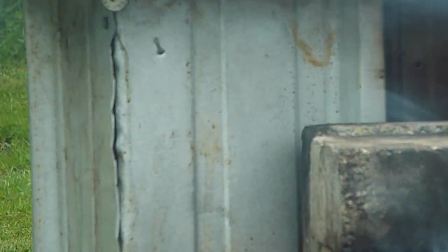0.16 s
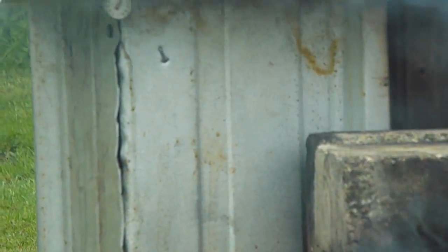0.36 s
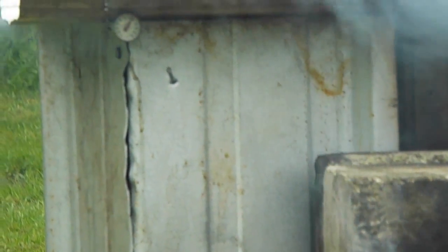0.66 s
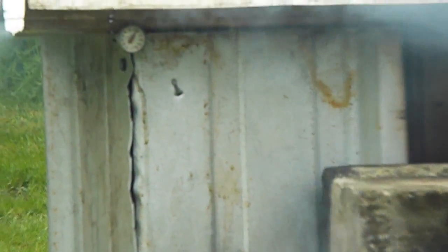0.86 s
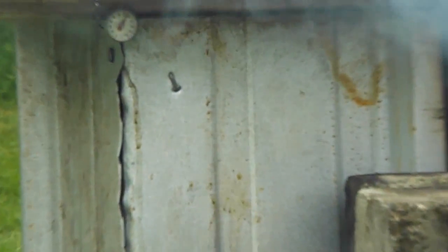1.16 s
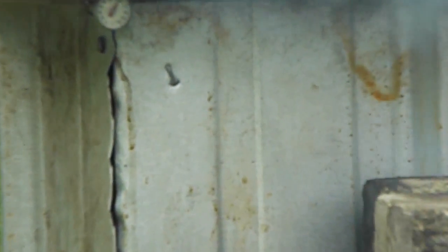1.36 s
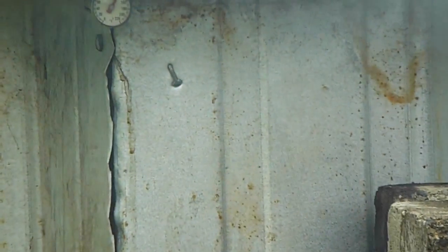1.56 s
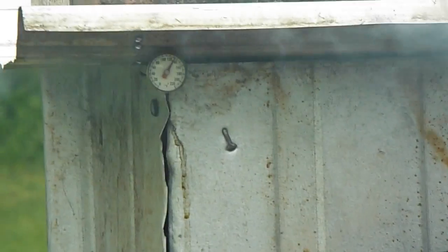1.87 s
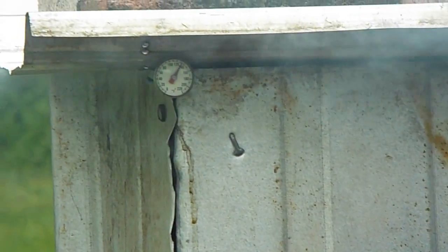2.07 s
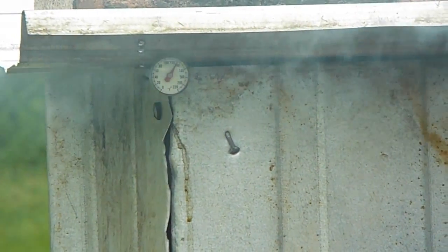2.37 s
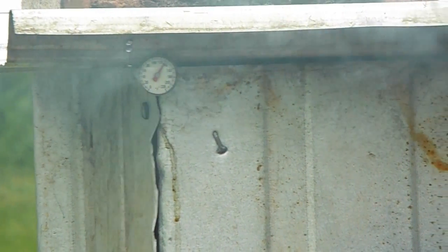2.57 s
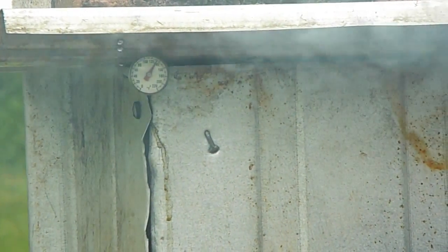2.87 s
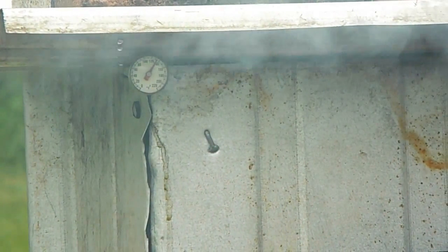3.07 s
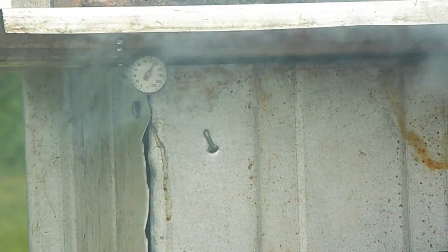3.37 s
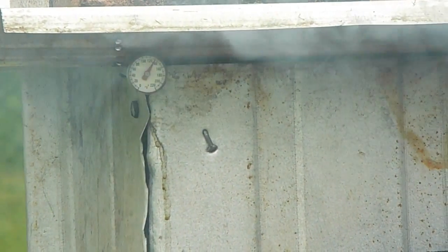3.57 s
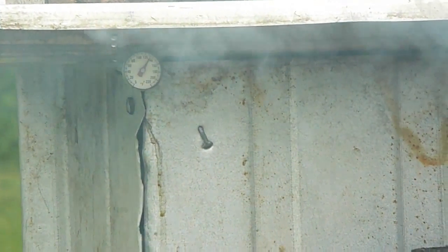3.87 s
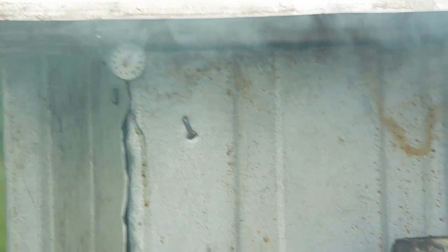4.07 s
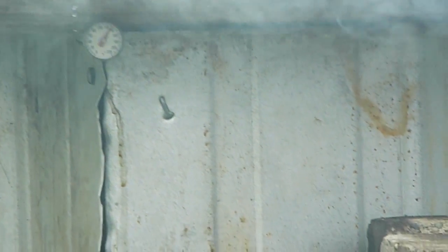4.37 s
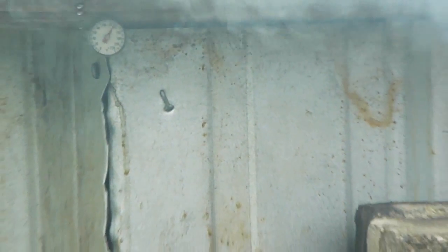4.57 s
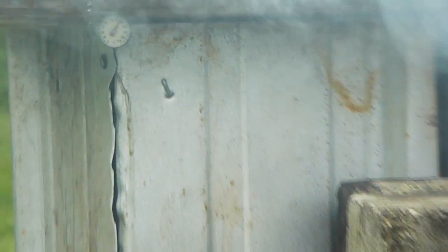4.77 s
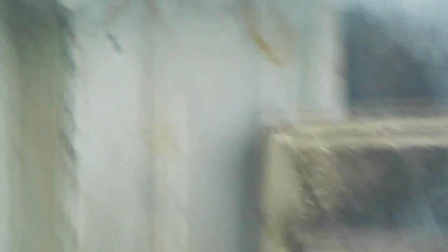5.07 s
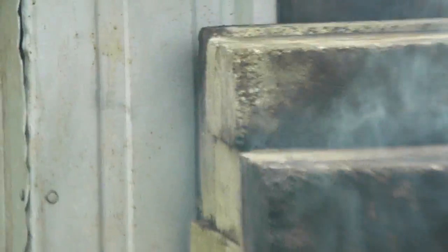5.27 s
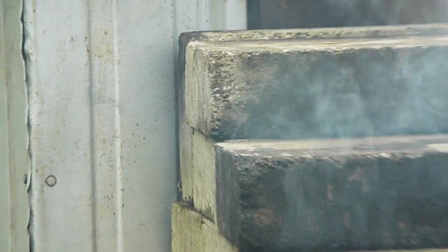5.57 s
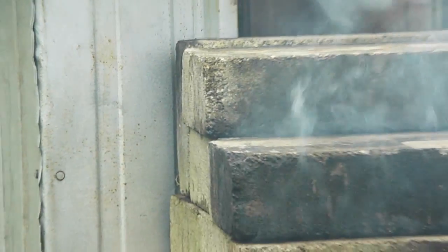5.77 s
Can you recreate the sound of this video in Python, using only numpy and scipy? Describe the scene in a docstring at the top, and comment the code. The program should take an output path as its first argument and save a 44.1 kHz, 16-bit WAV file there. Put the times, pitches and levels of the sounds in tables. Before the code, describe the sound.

Outdoors, heard from a camera's own stereo microphones. Low wind flutters and thumps at once, strongest around 0.3-0.6 s, over soft air hiss. Tiny plastic clicks tick from the start, with a sharper one near 0.2 s, while a distant bird trills rapidly until about 0.8 s. At 0.8 s a small zoom motor starts with a rasp, a dry, rattling whir with a thin whine, stopping near 1.45 s. Hard clicks cluster at 1.58-1.66 s with a dull grip thud and brief plastic ringing. From 1.7 to 3.9 s faint birds chirp and call hoarsely over rumbling gusts. Clicks, a slight finger rub and soft thuds return at 3.7-4.1 s. At 4.3 s the motor starts again, brighter and buzzier, pulsing quickly, and continues to the end at 6 s. Loud snaps cut across it near 4.66, 4.8 and 5.0 s, the last strongest, as the wind dies down.

```python
"""Outdoors, close to a hand-held camera: its zoom motor runs twice, the second time on to the end.
Gear teeth shake resonances into a rattle, with a whine, thin bearing whistles and a rasp at each start.
Fingers click the lever and creak the plastic, the grip thuds: noise bursts and tones in the shell.
The shell carries these to two microphone ports, left and right. Wind noise and single eddies push on
the ports, small birds call far off in gliding near-sine notes, and soft air noise lies beneath."""
import sys
import numpy as np
from scipy import signal
from scipy.fft import rfft, irfft, next_fast_len
from scipy.io import wavfile

SR = 44100
rng = np.random.default_rng(int(sys.argv[2]) if len(sys.argv) > 2 else 0)


def digitize_waveform(pressure):
    """Quantize a signal to 16-bit integers and store it at the path in sys.argv[1].

    Rows of a 2-D input are taken as channels; values are limited to [-1, 1].
    """
    field = np.atleast_2d(pressure).T
    bounded = np.clip(field, -1, 1)
    quanta = np.round(bounded * 32767).astype(np.int16)
    wavfile.write(sys.argv[1], SR, quanta)


N = 261513


def from_db(db):
    """Decibels become a plain gain."""
    return 10 ** (np.asarray(db) / 20)


def rms_one(x):
    """Scale a signal to an average strength (RMS) of 1."""
    return x / np.sqrt(np.mean(x ** 2) + 1e-20)


def at_hz(points, hz):
    """Read a curve between its points, along a logarithmic frequency scale."""
    point_hz, value = np.transpose(points)
    return np.interp(np.log(hz + 1), np.log(point_hz + 1), value)


def drift(rate_hz):
    """Random wandering of RMS 1: noise smoothed by two equal low-pass steps."""
    r = np.exp(-2 * np.pi * rate_hz / SR)
    noise = rng.standard_normal(N + SR)
    return rms_one(signal.lfilter([1], [1, -2 * r, r * r], noise)[SR:])  # drop the settling second


def coloured(spectrum):
    """Two unrelated noises with the given spectrum, together of RMS 1."""
    size = next_fast_len(N)
    hz = np.arange(size // 2 + 1) * SR / size
    white = rfft(rng.standard_normal((2, size)))
    return rms_one(irfft(white * from_db(at_hz(spectrum, hz)), size)[:, :N])


def resonate(x, hz, width_hz):
    """One resonance: passes a band around its pitch, with gain 1 at the top."""
    r = np.exp(-np.pi * width_hz / SR)
    feedback = [1, -2 * r * np.cos(2 * np.pi * hz / SR), r * r]
    return signal.lfilter([(1 - r * r) / 2, 0, (r * r - 1) / 2], feedback, x)


def resonate_twice(x, hz, width_hz):
    """The same resonance twice in a row, for steeper sides and a narrower band."""
    return resonate(resonate(x, hz, width_hz), hz, width_hz)


def swelling(s, db, rise_db_per_s, fall_db_per_s):
    """Gain that climbs to a top at s and sinks again, straight in decibels."""
    late = np.arange(N) / SR - s
    return from_db(db + np.minimum(rise_db_per_s * late, -fall_db_per_s * late))


def air():
    """Steady soft noise of the open air, partly shared by the two ports."""
    # spectrum of the air: (frequency [Hz], density [dB per Hz])
    air_spectrum = [(120, -29), (200, 0), (426, -9), (1420, -10.5), (1800, -12.5), (2090, -13.5),
                    (4790, -15.5), (7460, -22.5), (13700, -27.5), (15600, -26.5), (16300, -62)]
    far = coloured(air_spectrum)
    level = from_db(-63 + .5 * drift(4.2))  # the level drifts a little
    return level * (far + 0.32 * far[::-1])


def birds():
    """Near-sine notes on a bent glide; the trill echoes twice, and all calls scatter into a diffuse tail."""
    # one round of the trill: (time in round [s], length [s], start [Hz], middle [Hz], end [Hz],
    # average level [dB])
    syllable = [(0, 0.033, 5120, 4740, 3770, -57), (.037, 0.012, 4930, 4490, 4000, -59),
                (.049, .0055, 4600, 5650, 6800, -57), (.0558, .0055, 4600, 5600, 6800, -54)]
    # other clear notes: (time [s], length [s], start [Hz], middle [Hz], end [Hz], average level [dB])
    notes = [(0.423, 0.11, 1206, 1430, 1040, -65), (1.72, 0.031, 4900, 4800, 4700, -59),
             (1.797, 0.015, 5500, 5160, 4800, -57.5), (1.927, 0.073, 5770, 4600, 3570, -64),
             (2.069, 0.051, 3230, 3710, 3800, -65.5), (2.089, 0.017, 4040, 3360, 2500, -64),
             (2.082, 0.033, 6000, 5030, 3000, -66), (2.193, 0.12, 5100, 4020, 2960, -62.5),
             (2.241, .05, 6300, 5600, 4250, -65), (2.31, 0.046, 7300, 8000, 8300, -66),
             (2.403, 0.02, 6070, 6460, 6550, -66), (2.499, 0.0065, 5600, 4900, 4300, -53.5),
             (2.672, 0.007, 5500, 4900, 4400, -56.5), (2.756, .015, 5200, 5070, 4940, -61.5),
             (2.767, 0.025, 6580, 4930, 4200, -58), (2.817, 0.024, 4700, 4300, 4100, -61),
             (2.838, .012, 5500, 4780, 4280, -59), (2.847, 0.021, 5580, 4730, 4120, -55.5),
             (2.863, 0.024, 5640, 5630, 5400, -64.5), (2.905, .012, 5640, 5240, 4200, -63),
             (3.127, 0.01, 4400, 5480, 6700, -62), (4.2, .075, 4810, 4720, 4600, -72)]
    # hoarse calls: (time [s], length [s], start [Hz], middle [Hz], end [Hz], average level [dB])
    hoarse = [(3.175, .12, 6100, 6000, 5900, -68), (3.493, .125, 4870, 7100, 5700, -58),
              (3.51, .1, 5200, 6400, 5300, -63.5), (3.7, .04, 5300, 6400, 7500, -62),
              (3.733, .042, 7400, 7500, 5400, -58), (3.857, .06, 7200, 7800, 8100, -59)]
    # the trill comes back off two walls: (delay [s], level change [dB])
    echoes = [(.012, -11), (.036, -7)]
    trill_s, trill_period_s, trill_count = .192, .0718, 9
    scatter_t60_s, scatter_db = 0.52, -4.5  # walls and leaves scatter the calls

    trill = [(trill_s + k * trill_period_s + s, *rest) for k in range(trill_count) for s, *rest in syllable]
    echo = [(s + lag, *rest, db + loss_db) for lag, loss_db in echoes for s, *rest, db in trill]
    clear = trill + echo + notes
    out, rasp = np.zeros(N), drift(170)
    chances = rng.normal(0, 1, (199, 2))
    for k, (row, vary) in enumerate(zip(clear + hoarse, chances)):
        s, length, start_hz, mid_hz, end_hz, db = row
        is_clear = k < len(clear)
        u = np.linspace(0, 1, max(int(length * SR), 8))  # 0 to 1 through the note
        bend_hz = mid_hz - (start_hz + end_hz) / 2
        hz = start_hz * (1 - u) + end_hz * u + 4 * u * (1 - u) * bend_hz
        hz = hz * (1 + 0.0052 * vary[1])  # each note is a little off pitch
        loudness = from_db(db + 0.54 * vary[0]) * np.sin(np.pi * u) ** (1 if is_clear else .5)
        note = loudness * np.sin(2 * np.pi * np.cumsum(hz) / SR)
        place = slice(int(s * SR), int(s * SR) + len(u))
        out[place] += note * (1 if is_clear else rasp[place])
    out *= 1 + 0.35 * drift(160)  # uneven loudness within a note
    tail_s = np.arange(SR // 2) / SR
    tail = rng.standard_normal((2, SR // 2)) * from_db(-60 * tail_s / scatter_t60_s)
    tail *= from_db(scatter_db) / np.sqrt(np.sum(tail ** 2, axis=1, keepdims=True))
    return out + signal.fftconvolve(out[None], tail, axes=1)[:, :N]


def wind():
    """Lumpy pressure noise on each port, a deep rumble and a faster flutter; the left port is more sheltered."""
    # wind strength before lumps and shelter: (time [s], rumble level [dB], flutter level [dB])
    gusts = [(0.0, -33, -57), (0.27, -34, -50), (0.35, -33, -31.5), (0.45, -49, -34), (0.54, -36, -39.5),
             (0.72, -47, -58), (1.24, -36, -36.5), (1.36, -49, -51.5), (1.52, -54, -82), (1.78, -45, -55.5),
             (1.85, -36, -55.5), (2.1, -35.5, -48.5), (2.5, -38.5, -62.5), (2.63, -36.5, -47.5),
             (2.69, -42.5, -62), (2.77, -36, -45), (2.85, -42.5, -64), (2.99, -38.5, -56),
             (3.12, -39.5, -89), (3.38, -50, -62.5), (3.6, -42.5, -68), (3.75, -49.5, -71.5),
             (4.19, -54.5, -71.5), (4.4, -65, -64), (4.75, -50, -70), (5.2, -59.5, -62.5), (5.93, -63, -67)]
    # spectrum of the rumble: (frequency [Hz], density [dB per Hz])
    rumble_spectrum = [(15, -5.5), (30, 0), (50, 0.5), (80, -5), (120, -16), (300, -70.5), (1000, -110)]
    # spectrum of the flutter: (frequency [Hz], density [dB per Hz])
    flutter_spectrum = [(50, -34.5), (100, -1), (150, -2.5), (220, -10.5), (320, -23.5), (500, -33),
                        (1000, -60.5), (3000, -110)]
    s, *levels_db = np.transpose(gusts)
    rumble_db, flutter_db = [np.interp(np.arange(N) / SR, s, db) for db in levels_db]
    lumps = np.array([drift(11.4), drift(17.0)])  # one per port
    rumble = coloured(rumble_spectrum) * from_db(rumble_db + 4.6 * lumps)
    flutter = coloured(flutter_spectrum) * from_db(flutter_db + 3.8 * lumps)
    fade_in = np.clip(np.arange(N) / 600, 0, 1)
    return (rumble + flutter) * from_db([[-2.5], [1.5]]) * fade_in


def buffets():
    """Each eddy that hits a port is a swelling and sinking push of about two cycles."""
    # single eddies: (time [s], level [dB], pitch [Hz], left minus right [dB])
    eddies = [(0.281, -38, 111, -23), (0.399, -36, 119, -12), (0.546, -28, 117, -12),
              (0.319, -20.5, 159, 5), (0.332, -19.5, 84, -2), (0.355, -24.5, 61, -16),
              (0.433, -20, 101.5, -16), (0.489, -28.5, 76, -13), (0.592, -25, 134, -14),
              (0.706, -38, 107, -17), (1.159, -31.5, 126, -11), (1.319, -28, 115, -15),
              (1.951, -29, 109, -2), (2.085, -25.5, 68.6, 9), (2.342, -31.5, 65, -17),
              (2.384, -39.5, 168, -17), (2.596, -30.5, 65.4, 13), (2.751, -29.5, 64.3, -15.5),
              (2.878, -32, 79, -2), (2.968, -27, 62.5, -4)]
    edge_share, edge_ratio = 0.26, 2.317  # sharp ripple mid-eddy: share, multiple of the pitch
    out = np.zeros((2, N))
    for s, db, hz, pan_db in eddies:
        cycles = np.arange(int(1.9 * SR / hz)) * hz / SR
        swell = np.sin(np.pi * cycles / cycles[-1]) ** 2
        edge = edge_share * swell * np.sin(2 * np.pi * edge_ratio * cycles)
        push = (np.sin(2 * np.pi * cycles) + edge) * swell
        port_db = db + np.array([[pan_db / 2], [-pan_db / 2]])
        out[:, int(s * SR):int(s * SR) + len(cycles)] += from_db(port_db) * push
    return out


def through_shell(left, right):
    """The shell carries each frequency to the two ports with its own balance and phase."""
    # balance of the ports: (frequency [Hz], left minus right [dB])
    shell_pan = [(60, 1), (110, 1), (200, -1), (380, -3.5), (700, 1.5), (1290, -0.5), (2380, -0.5),
                 (4400, -3), (8120, -10), (15000, -0.5)]
    # how far the left port leads: (frequency [Hz], phase [radians])
    shell_phase = [(0, 0.46), (1700, 0.76), (3000, -2), (3500, -2.5), (4600, -0.4), (6500, -1.5),
                   (8400, -0.73), (16600, -3)]
    size = next_fast_len(N + 4096)
    hz = np.arange(size // 2 + 1) * SR / size
    pan_db = at_hz(shell_pan, hz)
    phase = np.interp(hz, *np.transpose(shell_phase))
    left_port = rfft(left, size) * from_db(pan_db / 2) * np.exp(1j * phase)
    right_port = rfft(right, size) * from_db(-pan_db / 2)
    return np.array([irfft(left_port, size)[:N], irfft(right_port, size)[:N]])


def thuds():
    """The grip shifts: a deep shell resonance swells and sinks as the palm presses it."""
    # dull thuds: (time [s], strength of the press [dB], pitch [Hz])
    presses = [(1.642, -37.5, 167), (3.856, -51.5, 165), (4.019, -43.5, 166), (4.31, -53, 168),
               (4.385, -51, 293), (4.649, -48.5, 168), (4.795, -51.5, 163.5), (4.83, -45.5, 162),
               (5.03, -51, 162)]
    width_hz, rise_db_per_s, fall_db_per_s = 55, 495, 257  # width of each of two filter passes
    noise = rng.standard_normal(N) * np.sqrt(SR / width_hz)
    out = np.zeros(N)
    for s, db, hz in presses:
        press = noise * swelling(s, db, rise_db_per_s, fall_db_per_s)
        out += resonate_twice(press + 1e-18, hz, width_hz)
    return out


def panels():
    """Some clicks leave two shell panels ringing as clear dying tones, a little off pitch each time."""
    # ringing clicks: (time [s], low panel level [dB], high panel level [dB])
    rings = [(0.181, -35, -52), (1.604, -31, -23), (1.6320, -21.5, -29.5), (1.6455, -29.5, -50),
             (1.6603, -25, -36.5), (3.7203, -28, -25), (3.8246, -61, -42), (3.8517, -57, -30),
             (3.9287, -49.5, -22.5), (3.98, -43, -32), (4.0167, -29.5, -42), (4.6621, -29, -38),
             (4.7882, -28, -38), (4.8187, -26, -35), (5.0109, -28, -24), (5.027, -23.5, -40)]
    # the two panels: (average pitch [Hz], time to die by 60 dB [s])
    panel_tones = [(1120, 0.034), (2420, 0.028)]
    out, t = np.zeros(N), np.arange(4000) / SR
    for (s, *levels_db), vary in zip(rings, rng.normal(0, .015, (len(rings), 2))):
        for db, (hz, t60), off in zip(levels_db, panel_tones, vary):
            ring = from_db(db - 60 * t / t60) * np.sin(2 * np.pi * hz * (1 + off) * t)
            out[int(s * SR):int(s * SR) + 4000] += ring
    return out


def treble_bursts():
    """Four clicks get a very short, broad burst of treble noise, as from an overloaded recorder."""
    # treble bursts: (time [s], strength before filtering [dB])
    bursts = [(1.5782, -17), (1.605, -39), (4.788, -16), (5.026, -15)]
    burst_hz, width_hz, t60_s = 13500, 18000, 0.0037  # width of each of two filter passes
    size = np.zeros(N)
    for s, db in bursts:
        late = np.arange(N) / SR - s
        size += (late >= 0) * from_db(db - 60 * np.clip(late, 0, 1) / t60_s)
    noise = rng.standard_normal(N) + .5 * rng.standard_normal((2, N))  # partly shared by left and right
    burst = size * noise * from_db([[-4.0], [0]]) + 1e-18
    return resonate_twice(burst, burst_hz, width_hz)


def fingers():
    """Each click jolts all shell resonances with rough noise that dies at its own rate; a sliding finger rubs."""
    # clicks and creaks: (time [s], strength [dB], then colour against that strength: above 7 kHz [dB],
    # middle, 1250-3000 Hz [dB], under 900 Hz [dB], length factor [times, held to 4 at most]);
    # from 900 to 1250 Hz the last two colours are averaged
    clicks = [(0.0363, -38, -31, -11, -10.5, 1.7), (0.114, -30.5, -7, -8, -14.5, 1.34),
              (0.1505, -36, -17, -2, -4, 0.63), (0.156, -38.5, -10, -14, -33, 4.5),
              (0.1742, -17, 2.5, -15.5, -38, 0.85), (0.183, -21.5, -28, -9.5, -17, 0.67),
              (0.3263, -25, -36, -8, -23, 0.72), (0.3548, -21.5, -37, -8, -23, 0.73),
              (0.4061, -13, -42, -11.5, -30, 0.67), (0.4224, -28.5, -10, -10.5, -24, 0.87),
              (0.803, -35.5, 3, -2, -12, 3.5), (1.1651, -26, -21, -11.5, -34, 1.4),
              (1.227, -24, -13, -12.5, -24.5, 1.6), (1.5776, -8.5, 5, -15, -21, 0.63),
              (1.592, -34.5, -13, 1, -5, 1.2), (1.605, -9.5, -2.5, -18.5, -19, 0.89),
              (1.6189, -30, -4, -8, -3, 1.4), (1.6319, -12.5, -4.5, -9, -13, 1.06),
              (1.646, -43.5, -21, -1, 11, 1), (1.6594, -30.5, -29, 3, 3, 1.1),
              (1.8094, -27.5, -13, -19.5, -53, 1.66), (1.828, -44, -8, -28, -33, 3.9),
              (3.7198, -10, -4, -13.5, -27, 0.99), (3.7878, -41.5, 4, -2.5, 0, 0.97),
              (3.825, -42, -14, -8, -11, 1.7), (3.851, -23.5, -7.5, -8, -14.5, 0.88),
              (3.9282, -16, -41, -10, -31, 0.71), (3.9796, -11, 0, -13, -27, 1.25),
              (3.993, -38, -7, -14, -7, 0.6), (4.0165, -7.5, 0, -10, -16.5, 0.57),
              (4.0305, -13.5, 7, -14.5, -26, 1.08), (4.0652, -42.5, -22, -2, -7, 1),
              (4.0966, -33.5, -20.5, -5, -13, 0.71), (4.303, -33.5, -2, 1.5, -34, 0.84),
              (4.6377, -23.5, -5, -8, -14, 1.16), (4.6471, -24.5, -14, -17, -14, 1),
              (4.6601, -10.5, 3.5, -17, -24.5, 1.04), (4.765, -48.5, -20, 4, -8, 1.7),
              (4.788, -8.5, -6, -13, -19, 0.78), (4.8028, -34, -19, 0.5, 2, 0.91),
              (4.8179, -19.5, -7, -9.5, -13, 1.13), (4.8434, -29.5, -12, -4.5, -28, 1.4),
              (4.978, -46.5, -22, -1, 0, 0.57), (5.0114, -9.5, 0, -11, -16, 0.81),
              (5.027, -2.5, 1.5, -20, -31.5, 0.5), (5.1197, -31.5, -16, -22, -11, 1.3),
              (5.342, -47, -12, -30, -6, 1.3)]
    # shell resonances: (pitch [Hz], width before widening [Hz], strength [dB],
    # time to die by 60 dB before the length factor [s])
    shell = [(142.6, 50, 3, 0.089), (237.4, 40, 2.5, 0.13), (489, 99.8, 5, 0.058), (899.7, 156, 5.5, 0.06),
             (1118, 334, 10.5, 0.047), (1533, 390, 7.5, 0.041), (2372, 445, 7, 0.042),
             (2868, 655, 11.5, 0.038), (4270, 430, -5.5, 0.028), (4638, 340, 0, 0.01),
             (5610, 600, 1.5, 0.017), (6080, 580, 0, 0.016), (7133, 780, -1, 0.014),
             (8500, 690, 1.5, 0.011), (9100, 690, -13, 0.0075), (12030, 4800, -18.5, 0.0076)]
    click_scatter, scatter_full_hz = 0.39, 1500  # share that differs between the ports; fades below this
    shell_top_hz = 10650  # the plastic swallows click sound above this

    s, peak_db, high_db, mid_db, low_db, stretch = np.transpose(clicks)
    length = np.clip(stretch, .2, 4)[:, None]
    tail = np.arange(4000) / SR
    chance_db = rng.normal(0, 1.2, (len(s), len(shell)))
    rough = rng.standard_normal((len(s), 3, 4000))  # one shared noise, then one per port
    rough *= 1 + 1.026 * np.exp(-tail / 0.001)  # the first contact is the hardest
    at = (np.round(s * SR).astype(int)[:, None] + np.arange(4000)).ravel()

    slide = swelling(3.915, -52, 400, 95)  # top [s], strength [dB], rise and fall [dB per s]
    rub = slide * rng.standard_normal((2, N))
    out = resonate(resonate(rub, 5700, 2500), 5500, 2300) * 5.4
    out += resonate(resonate(rub, 1800, 950), 2770, 900) * 10.5

    for k, (hz, width_hz, db, t60) in enumerate(shell):
        if hz < 900:
            part_db = low_db
        elif hz < 1250:
            part_db = (low_db + mid_db) / 2
        elif hz < 3000:
            part_db = mid_db
        else:
            part_db = high_db if hz > 7000 else 0
        # narrow resonances need a stronger push
        size = from_db(peak_db + part_db + db + chance_db[:, k]) * np.sqrt(SR / width_hz / 40)
        dying = size[:, None] * from_db(-60 * tail / (t60 * length))
        apart = click_scatter * min(1, hz / scatter_full_hz) ** 2
        ports = np.sqrt(1 - apart) * rough[:, 0] + np.sqrt(apart) * rough[:, 1:].swapaxes(0, 1)
        # lay every burst at its moment
        jolts = np.array([np.bincount(at, (dying * port).ravel(), N + 4000)[:N] for port in ports])
        out += resonate_twice(jolts + 1e-18, hz, 1.75 * width_hz)
    out[0] -= 0.26 * resonate(out[0], 9000, 5000)  # the hand keeps some treble from the left port
    band = signal.butter(4, [125, shell_top_hz], "band", fs=SR, output="sos")
    return signal.sosfilt(band, out)


def running(start_s, stop_s):
    """Motor loudness: a quick spin-up, then a coast to silence after the stop."""
    spin_up_s, coast_db_per_s = 0.0052, 815
    t = np.arange(N) / SR
    spin_up = np.clip((t - start_s) / spin_up_s, 0, 1) ** .5
    return spin_up * from_db(-coast_db_per_s * np.maximum(t - stop_s, 0))


def motor(run, resonances, whistles):
    """Teeth rattle into resonances; the meshing teeth whine on a gliding pitch that swells each gear turn."""
    # the motor sound dips just after some clicks, holds low, then rises again:
    # (time [s], depth [dB], hold [s])
    dips = [(4.67, 5.5, 0.0083), (4.798, 9, 0.011), (5.033, 11.5, 0.028)]
    dip_rise_db_per_s = 225
    shell_scatter = 0.22  # share of rattle that differs between the ports
    throb_db, wobble = 0.9, 0.042  # an off-centre gear swings load and speed once a turn
    low_throb_db, rotor_hz, rotor_db = 1.9, 88.8, 2.2  # low rattle also beats with gear and rotor
    flicker_db, flicker_hz, flicker_top_hz = .8, 21, 5920  # each low resonance drifts on its own
    hollow_hz, hollow_width_hz, hollow_share = 3390, 104, 0.62  # the lens barrel swallows a narrow band
    mesh_settle_s = 0.2  # the mesh tone comes up once the gears run true
    start_db, start_hz, start_width_hz, start_fade_db_per_s = -48, 1600, 750, 110  # starting rasp

    (start, stop, rattle_db, slow_hz, fast_hz, fast_s,
     tone_db, overtone_db, turns_hz, turn_start, swell_db) = run
    t = np.arange(N) / SR
    since = t - start
    mesh_hz = np.interp(t, [start, fast_s, stop], [slow_hz, fast_hz, slow_hz])
    turn = 2 * np.pi * (turn_start + turns_hz * since) + 0.33 * drift(5.55)
    load = np.cos(turn)

    # two gear pairs, each with one shared noise and one per port
    teeth = rng.standard_normal((2, 3, N)) * from_db(throb_db * load + 0.54 * drift(150))
    ports = np.sqrt(1 - shell_scatter) * teeth[:, :1] + np.sqrt(shell_scatter) * teeth[:, 1:]
    beat_db = low_throb_db * load + rotor_db * np.cos(2 * np.pi * rotor_hz * since + drift(1.3))
    rattle = np.zeros((2, N))
    for k, (hz, width_hz, db) in enumerate(resonances):
        move_db = beat_db + flicker_db * drift(flicker_hz) if hz < flicker_top_hz else 0
        rattle += from_db(db + move_db) * resonate_twice(ports[k % 2], hz, 2.0 * width_hz)
    rattle = rattle - hollow_share * resonate(rattle, hollow_hz, hollow_width_hz)

    speed = 1 + wobble * np.sin(turn) + 0.00674 * drift(42.5)
    mesh = 2 * np.pi * np.cumsum(mesh_hz * speed) / SR
    swell = from_db(swell_db * (load - 1.5) + 2.5 * drift(30))
    grain = 0.84 + 0.52 * drift(190)  # uneven teeth smear the tones into rough bands
    settle = np.clip(since / mesh_settle_s, 0, 1) ** 2
    tone = from_db(tone_db) * settle * np.sin(mesh)
    overtone = from_db(overtone_db) * np.sin(2 * mesh)
    whine = swell * grain * (tone + overtone)
    for hz, db in whistles:
        level = from_db(db + beat_db + 2 * drift(25))
        wander_hz = hz * (1 + .011 * drift(4))
        whine = whine + level * np.sin(2 * np.pi * np.cumsum(wander_hz) / SR)

    # rasp while the gears take up the load
    rasp = rms_one(resonate_twice(ports[0], start_hz, start_width_hz))
    rasp = rasp * from_db(start_db - start_fade_db_per_s * np.maximum(since, 0))
    dips_db = np.zeros(N)
    for s, db, hold in dips:
        dips_db += (t > s) * np.clip(db - dip_rise_db_per_s * (t - s - hold), 0, db)
    sound = from_db(rattle_db) * rms_one(rattle) + whine + rasp
    return running(start, stop) * from_db(-dips_db) * sound


def scene():
    """The camera's own sounds go through the shell; wind, birds and air reach the ports directly."""
    # motor runs: (start [s], stop [s], rattle level before the dips [dB], slowest gear mesh [Hz],
    # fastest mesh [Hz], fastest at [s], mesh tone before swell [dB], overtone before swell [dB],
    # gear turns [Hz], turn at start [0-1], swell per turn [dB])
    zooms = [(.779, 1.447, -42, 835.6, 894.4, 1.2, -72, -43, 17.8, 0.23, 1.5),
             (4.279, 6.0, -43.5, 830, 833, 5.2, -53.5, -72, 19.5, 1, 5)]
    # resonances that the rattle shakes in each direction:
    # (pitch [Hz], width before doubling [Hz], relative level [dB])
    rattle_in = [(700, 580, -22.5), (1696, 176, -10.5), (2850, 870, -11.5), (3710, 350, -6.5),
                 (4240, 260, -10), (4510, 250, -14), (6300, 250, -15.5), (7000, 380, -19),
                 (7760, 270, -18.5), (8620, 410, -13.5), (9260, 250, -15.5), (10000, 150, -21.5),
                 (11700, 400, -32.5)]
    rattle_out = [(332, 38, -1.5), (435, 162, -11), (1300, 1230, -14), (2055, 50, -10.5), (2784, 450, -2.5),
                  (3690, 350, -3), (4590, 170, 0.5), (5120, 560, -5.5), (6720, 280, -4), (7400, 280, -17),
                  (8400, 670, -6.5), (9150, 160, -7), (9770, 240, -11.5), (11700, 106, -21)]
    # thin bearing whistles in each direction: (average pitch [Hz], level before beating [dB])
    whistles_in = [(3750, -58)]
    whistles_out = [(2850, -59), (4680, -53)]
    gears = motor(zooms[0], rattle_in, whistles_in) + motor(zooms[1], rattle_out, whistles_out)
    camera = gears + fingers() + treble_bursts() + thuds() + panels()
    return through_shell(*camera) + wind() + buffets() + birds() + air()


def record(dry):
    """The loudest peaks are rounded off, and the treble above 17 kHz is cut."""
    top = .93
    rounded = top * np.tanh(dry / top)
    return signal.sosfilt(signal.cheby2(14, 80, 17000, fs=SR, output="sos"), rounded)


dry = scene()
out = record(dry)
digitize_waveform(out)
```